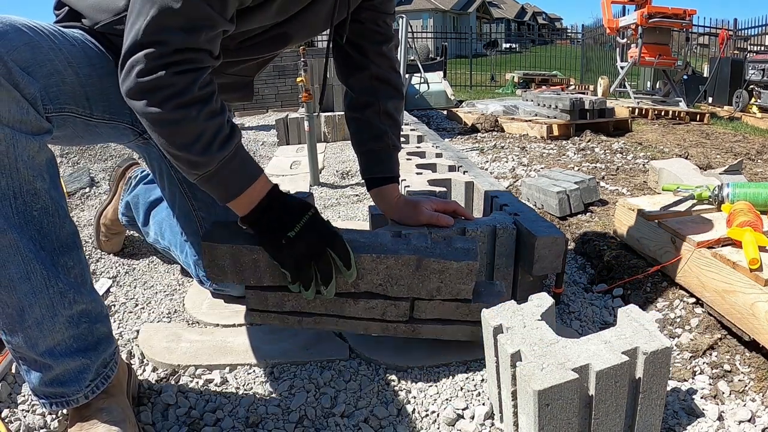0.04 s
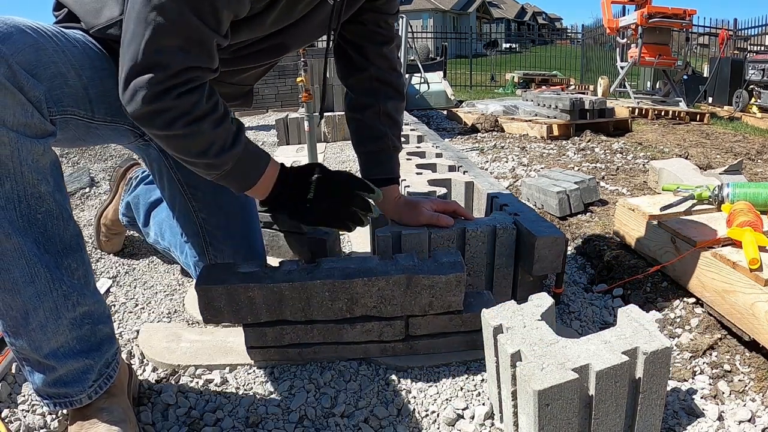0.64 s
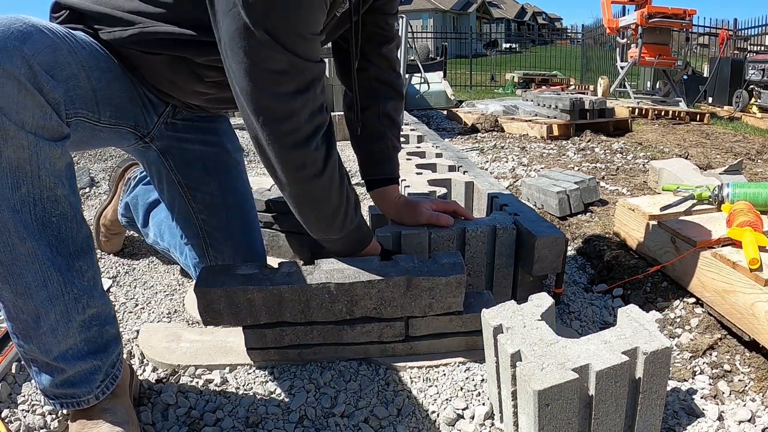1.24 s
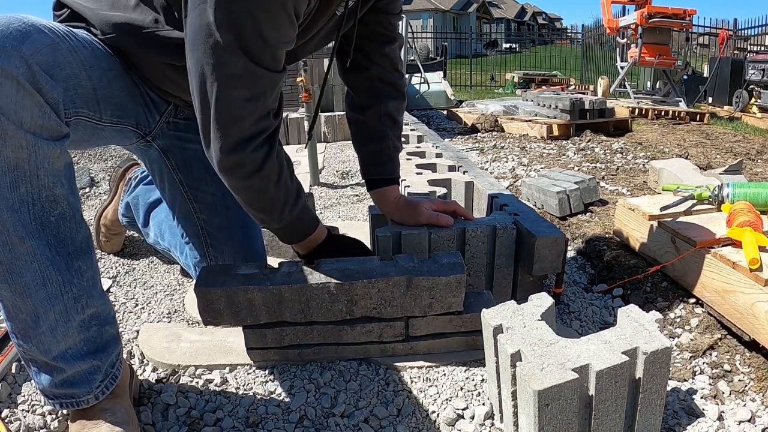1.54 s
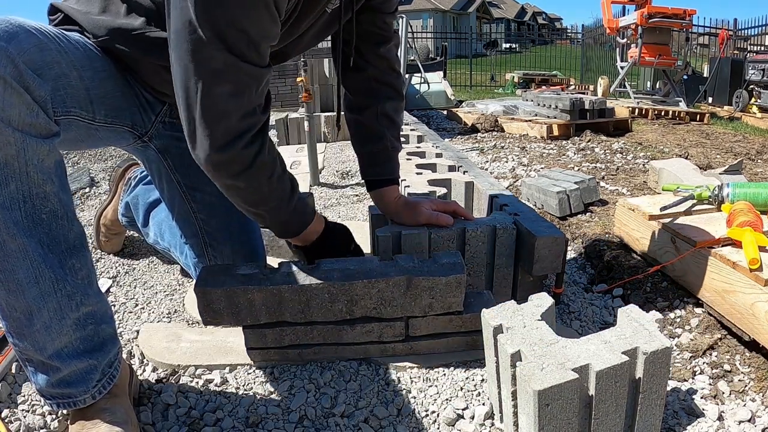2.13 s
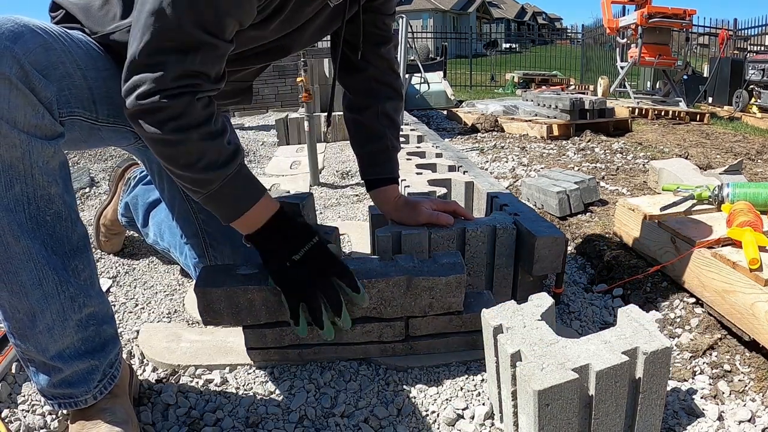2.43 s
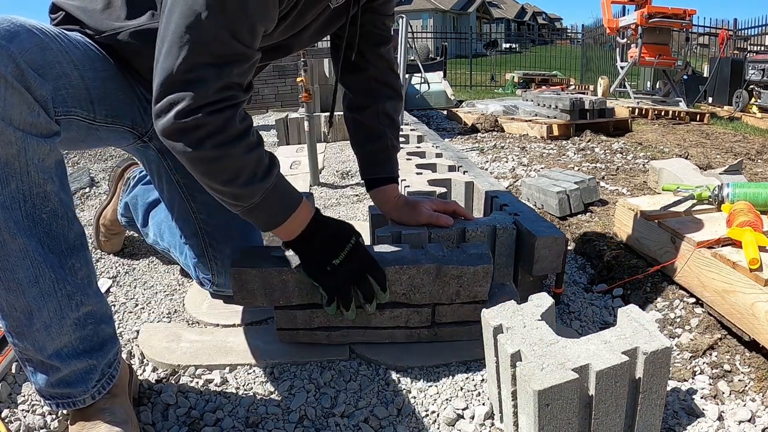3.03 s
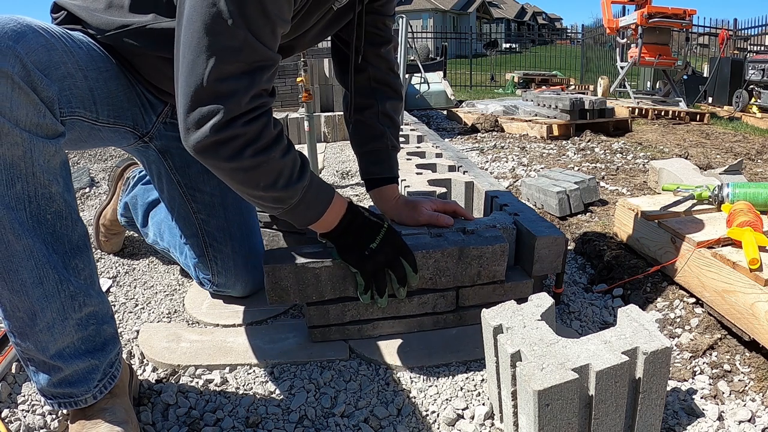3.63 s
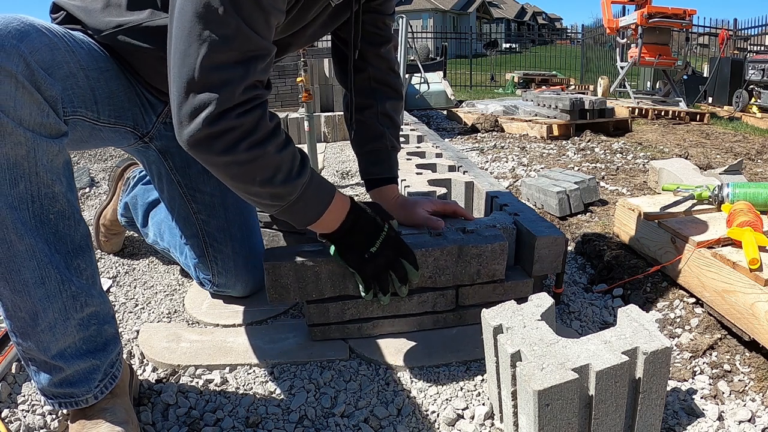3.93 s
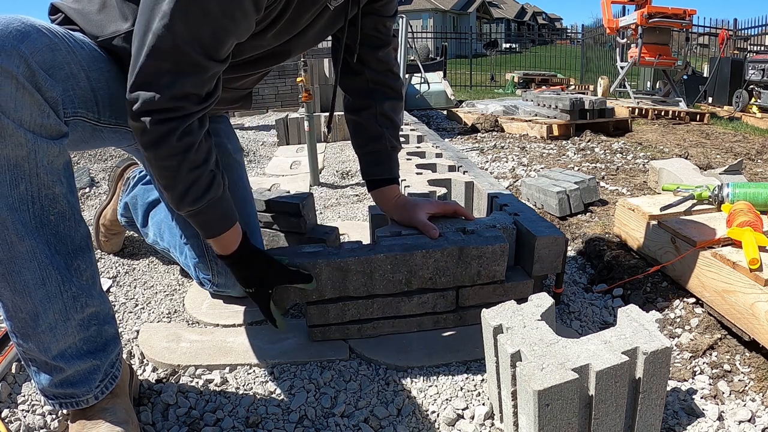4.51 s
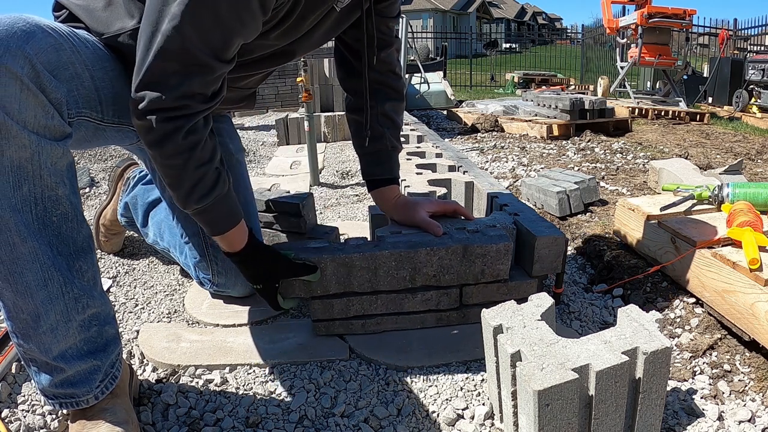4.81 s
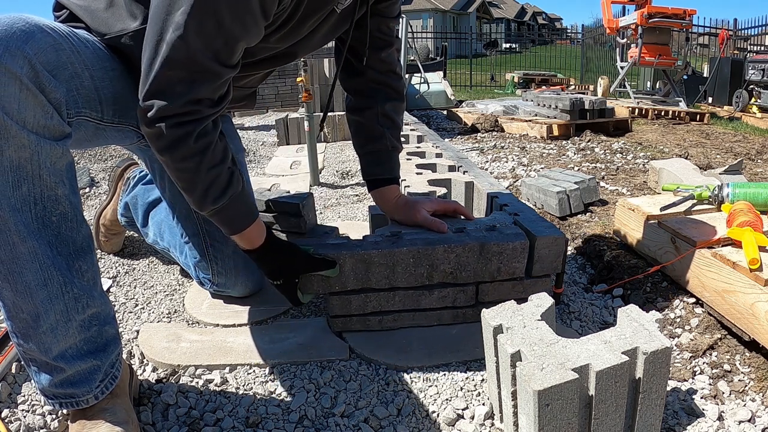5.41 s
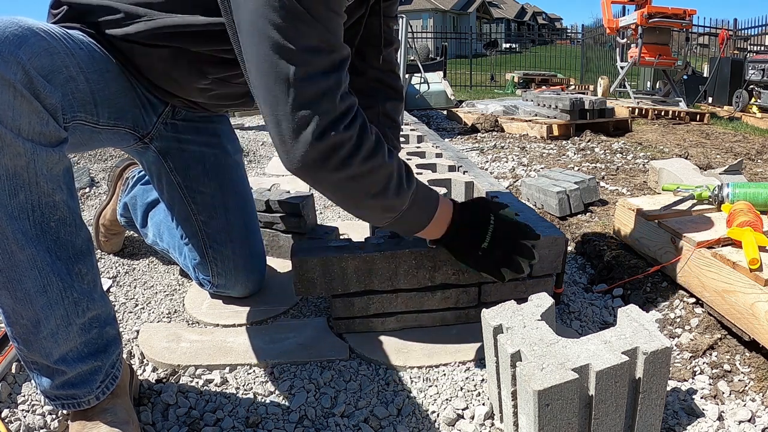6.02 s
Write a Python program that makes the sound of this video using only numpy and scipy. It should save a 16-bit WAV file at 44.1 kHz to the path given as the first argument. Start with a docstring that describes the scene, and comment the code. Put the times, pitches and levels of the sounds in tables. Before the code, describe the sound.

A concrete block knocks down onto others and grinds into place, with glove rubs and wind rumbling on the microphone.

```python
"""A concrete wall block, close to the microphone, is set on the course below, rocks twice and is shoved
into place in two runs. Blows ring its modes and thump the stack; sliding, it grinds; it clinks as it
knocks lightly or catches on grit. In between, a work glove sweeps the blocks: fabric snaps, fingertips
rasp, crumbs crack. Outdoors in a yard with little echo; wind buffets the microphone over a faint hiss."""
import sys
import numpy as np
from scipy import signal
from scipy.fft import rfft, irfft, next_fast_len
from scipy.io import wavfile
from scipy.ndimage import uniform_filter1d

SR = 44100
rng = np.random.default_rng(int(sys.argv[2]) if len(sys.argv) > 2 else 0)


def generate_wav(signal):
    """Clip the signal to [-1, 1] and save it as 16-bit WAV at the path in sys.argv[1]."""
    frames = np.transpose(np.atleast_2d(signal))
    scaled = np.clip(frames, -1, 1) * 32767
    pcm = np.round(scaled).astype(np.int16)
    wavfile.write(sys.argv[1], SR, pcm)


N = 276066

# The block's modes. Each row: pitch in Hz, then relative dB when struck, in the first slide, in the second.
BLOCK_MODES = [(790, -4.5, -10, -14), (1408, -20, 0, 0), (1754, -15, -7, -10), (2044, -24, -5.5, -6),
               (2752, -7.5, -6.5, -5), (3162, -14, -15, -8), (3586, -25, -16, -16), (3881, -27, -16, -15),
               (4205, -25, -8, -9), (4325, -21, -5, -14), (4695, -27, -13.5, -18), (5025, -28, -24, -16),
               (5515, -17, -16, -21), (6080, -35, -29, -31), (6390, -40, -32, -27), (6730, -42, -27, -31),
               (7130, -40, -25, -19), (7930, -35, -24, -38), (8880, -25, -38, -29), (9260, -28, -29, -32),
               (9870, -28, -27, -36), (11200, -32, -33, -32), (11900, -27, -30, -39),
               (12700, -33, -35, -39)]
# Block against block. Each row: start in seconds, ring in dB, brightness in Hz, favoured mode in Hz, its
# boost in dB, damping in dB per second (sign ignored), thud in dB, thud pitch in Hz, contact in seconds.
BLOWS = [(.2912, -17, 7100, 2700, 1, 9, -13.5, 840, 0.0067),
         (.2938, -29.5, 1090, 790, 17, -11, -11.5, 260, 0.011),
         (0.436, -30, 3350, 2090, 21, 29, -9, 507, 0.0099),
         (0.5145, -17.5, 1540, 2120, 19.5, 195, -8, 590, 0.0033),
         (3.7301, -25.5, 2320, 1465, 26.5, 588, -10.5, 434, 0.0039),
         (5.039, -39, 3000, 3180, 21, 250, -14, 409, 0.0061)]
# Tipping onto one edge stiffens the lowest mode. Each row: time in seconds, rise in Hz.
EDGE_BEND = [(.345, 0), (.385, 40), (.42, 12), (.515, 38), (.56, 0)]
# Shoves along the course. Each row: start and length in seconds, fastest point as a share of the length,
# grinding in dB, tilt in dB per octave, growl in dB relative to the grinding.
BLOCK_SHOVES = [(2.815, 0.4, 0.46, -41.5, -0.5, -3), (3.002, .44, 0.64, -36, 0.5, -10),
                (3.33, 0.42, 0.24, -44.5, -3.5, -3), (3.501, 0.41, 0.67, -40.5, -3.5, -3),
                (3.882, 0.33, 0.23, -52, -2, -1), (4.756, 0.42, 0.61, -44, 2.5, 5),
                (4.916, 0.21, 0.37, -39, -4.5, 0), (5.17, 0.41, 0.28, -44.5, 2.5, 5.5),
                (5.431, 0.29, 0.52, -40.5, -0.5, 2.5)]
# Short clinks with a crunch: the block knocks lightly or catches on grit. Each row: start in seconds,
# clink in relative dB, favoured mode in Hz, crunch in relative dB.
BLOCK_CLINKS = [(0.798, -57, 4300, -77), (0.845, -47.5, 5500, -39), (0.846, -46, 2044, -62),
                (2.94, -30, 4300, -43), (3.308, -30, 1408, -40), (3.363, -28.5, 4830, -46),
                (3.831, -45, 1408, -51), (4.003, -37.5, 1408, -55), (4.14, -46.5, 2044, -66),
                (4.824, -44.5, 1408, -66), (4.879, -39.5, 4270, -41), (5.066, -34, 2752, -31),
                (5.1486, -32.5, 2950, -31), (5.227, -43, 1408, -49), (5.639, -42.5, 5300, -32),
                (5.697, -45, 1408, -45), (5.778, -42, 5000, -44)]
# Glove and sleeve on concrete. Each row: start and length in seconds, fastest point as a share of the
# length, level in dB, tilt in dB per octave.
GLOVE_SWEEPS = [(0.168, 0.53, 0.33, -48.5, 7.5), (0.573, 0.13, 0.75, -42, 5.5),
                (1.08, 0.18, 0.59, -55, 2.5), (1.208, 0.25, 0.33, -42.5, 3.5),
                (1.253, 0.37, 0.47, -42.5, 5), (1.789, 0.16, 0.56, -40.5, 4.5),
                (1.883, 0.066, 0.47, -42, 10), (2.19, 0.075, 0.52, -41.5, 7),
                (2.349, 0.045, 0.55, -46.5, 10.5), (2.589, 0.072, 0.41, -54.5, 13),
                (2.612, 0.38, 0.41, -62.5, 10.5), (3.838, 0.54, 0.18, -53.5, 9),
                (4.228, 0.16, 0.85, -55, 9), (4.333, 0.5, 0.13, -61, 4.5), (5.762, 0.25, 0.16, -52, 9.5)]
# Fingertip drags. Each row: start and length in seconds, fastest point as a share of the length,
# level in dB, then first pitch, last pitch and half-width in Hz.
FINGER_DRAGS = [(0.589, 0.115, 0.64, -40.5, 1810, 2094, 595), (4.309, 0.07, 0.89, -47.5, 2274, 1873, 350),
                (4.369, 0.18, 0.63, -54, 1430, 1040, 190)]
# Loose grit under the hand. Each row: start in seconds, level in relative dB, band centre in Hz.
GRIT_TICKS = [(0.385, -37, 3760), (1.21, -38.5, 1720), (2.651, -43, 2050), (2.6963, -39.5, 2200),
              (2.737, -42, 2600), (2.782, -48.5, 2500), (3.861, -41.5, 2840), (4.685, -38.5, 1600)]
# Gusts on the microphone. Each row: start and hold in seconds, rumble in dB, flutter in dB relative to it.
MIC_GUSTS = [(0, 0.0078, -26.5, -15), (0.095, 0.23, -22.5, -11), (0.405, 0.13, -33, -5),
             (0.751, 0.0093, -26.5, -11), (1.837, 0.047, -30, -3.5), (2.233, 0.041, -31.5, -5.5),
             (2.686, 0.039, -36, -4.5), (2.858, 0.069, -34.5, 0), (3.298, 0.0065, -38, 4),
             (3.456, 0.0056, -25, -5.5), (3.602, 0.345, -28, -4.5), (3.945, 0.21, -30.5, -4),
             (4.227, 0.0096, -24, -8.5), (4.59, 0.11, -28.5, -6.5), (5.78, 0.055, -28, -7)]
# Spectra of crushed grit, the course below, the glove, the wind's rumble and flutter, and the open air.
# Each row: frequency in Hz, spectral density in relative dB.
CRUNCH_SPECTRUM = [(900, 11), (4500, -6), (10000, -11), (14000, -32)]
GROWL_SPECTRUM = [(200, -1), (430, -1.5), (1000, -21), (1600, -16)]
GLOVE_SPECTRUM = [(450, 4.5), (850, 0.5), (1400, 7), (1900, 4.5), (2600, -1), (7300, -26), (15000, -49.5)]
RUMBLE_SPECTRUM = [(18, -3.5), (30, 1), (60, 3), (100, -2), (140, -9), (250, -56)]
FLUTTER_SPECTRUM = [(90, -16), (150, 3), (230, -5.5), (400, -22), (1000, -46.5)]
AIR_SPECTRUM = [(800, 0), (2600, -16), (8800, -23), (11000, -38)]

LONG_RING_HZ = 1408   # the supports barely damp this mode


def knocks(thud_sag=.75, rattle_db=-21, choke_t60=.028):
    """Each blow rings the block, cracks grit at the contact and thumps the heavily damped stack below."""
    out, t = np.zeros(N), np.arange(SR) / SR
    for start, ring_db, bright_hz, spot_hz, spot_db, damping, thud_db, thud_hz, contact_s in BLOWS:
        bend = np.cumsum(np.interp(start + t, *np.transpose(EDGE_BEND))) / SR
        modes = 0
        for k, (hz, db, *_) in enumerate(BLOCK_MODES):
            # the contact spot favours one mode; a blunt contact leaves out the upper ones
            gain = from_db(db + spot_db * nearness(hz, spot_hz)) / np.hypot(1, (hz / bright_hz) ** 3)
            tone = np.sin(2 * np.pi * (hz * t + bend * (k == 0)))
            modes += (-1) ** k * gain * tone * dying(t, ring_time(hz, damping))
        # the next landing chokes what still rings
        landing = min([s for s, *_ in BLOWS if s > start + .02], default=start + 1)
        modes *= dying(np.maximum(start + t - landing, 0), choke_t60)
        crack = cut(noise(SR), [300, max(bright_hz * .73, 800)], "band", order=3) * dying(t, .035)
        strike = (modes + crack) * rising(t, .00019)
        # the thud lasts only as long as the contact and sinks in pitch as it relaxes
        progress = np.clip(t / contact_s, 0, 1)
        sinking_hz = thud_hz * (1 + thud_sag * (.5 - progress))
        thud = np.sin(2 * np.pi * np.cumsum(sinking_hz) / SR) * np.sin(np.pi * progress)
        rattle = rms_one(cut(noise(SR), [180, 850], "band", order=3)) * dying(t, .11) * rising(t, .00074)
        stack = thud + from_db(rattle_db) * rattle
        add(out, start, from_db(ring_db) * strike + from_db(thud_db) * stack)
    return out


def sliding(speed_power=2.09, judder_db=2.3, wander_db=2.4, crush_db=-17, smear_hz=4500):
    """Grit breaks under the moving block in uneven slips and keeps it ringing; the course below growls."""
    starts, _, _, grind_db, tilt, growl_db = np.transpose(BLOCK_SHOVES)
    speeds = np.array([stroke(*shove[:3]) for shove in BLOCK_SHOVES])
    forces = from_db(grind_db)[:, None] * speeds ** speed_power
    shares = np.transpose([mode_shares(start) for start in starts])
    judder = rms_one(from_db(judder_db * drift(50)))
    slips = evened(grains(per_s=2500, spread_db=.5), .011)
    rings = 0
    for (hz, *_), share in zip(BLOCK_MODES, shares):
        octaves_up = np.clip(np.log2(hz / LONG_RING_HZ), 0, 2)
        push = (share * from_db(tilt * octaves_up)) @ forces
        # weight on the block shortens its ring; grit in the contact damps the high modes further
        t60 = ring_time(hz, damping_db_per_s=170 * (1 + (hz / smear_hz) ** 3))
        # friction both feeds and damps each mode, so its ring holds steady under the push
        held = evened(rms_one(ring(slips, hz, t60)), .04)
        rings += push * held * from_db(wander_db * drift(8.3))   # the moving contact shifts its strength
    crush = from_db(crush_db) * (from_db(tilt) @ forces) * coloured(slips, CRUNCH_SPECTRUM)
    growl = (from_db(growl_db) @ forces) * coloured(noise(), GROWL_SPECTRUM)
    return judder * (rings + crush + growl)


def clinks(clink_gain_db=4, crunch_gain_db=-3, rise_s=.0035, spot_db=10):
    """The block knocks lightly or catches on grit: its modes ring briefly, with a bright crunch."""
    rings, crunch_level, t = np.zeros(N), np.zeros(N), np.arange(SR // 5) / SR
    hz = np.transpose(BLOCK_MODES)[0]
    onset = rising(t, rise_s)
    decays = dying(t, ring_time(hz, damping_db_per_s=330)[:, None])
    for start, clink_db, spot_hz, crunch_db in BLOCK_CLINKS:
        phases = rng.uniform(0, 2 * np.pi, len(hz))
        modes = np.sin(2 * np.pi * hz[:, None] * t + phases[:, None]) * decays
        gains = mode_shares(start) * from_db(spot_db * nearness(hz, spot_hz))
        clink = gains @ modes / np.linalg.norm(gains)
        add(rings, start, from_db(clink_db + clink_gain_db) * onset * clink)
        add(crunch_level, start, from_db(crunch_db + crunch_gain_db) * onset * dying(t, .045))
    return rings + crunch_level * coloured(grains(per_s=15000, spread_db=0), CRUNCH_SPECTRUM)


def ring_time(hz, damping_db_per_s):
    """Seconds to fall 60 dB: concrete swallows high modes sooner, and the contact adds its own loss."""
    free_t60 = .26 / np.hypot(1, hz / 2700) * (1 + 2 * nearness(hz, LONG_RING_HZ))
    return 60 / (60 / free_t60 + np.abs(damping_db_per_s))


def mode_shares(seconds, regrip_s=4.5):
    """Mode amplitudes in a slide, total power 1; between slides the hand moves to the block's end."""
    gains = from_db([second if seconds > regrip_s else first for _, _, first, second in BLOCK_MODES])
    return gains / np.linalg.norm(gains)


def glove(speed_power=1.84, patchy_db=1.5, flicker_db=2.2, bounce_s=.000829):
    """Fabric catches on the rough face in thousands of tiny snaps; each sweep has its own brightness."""
    rubs = np.array([from_db(db) * stroke(*timing) ** speed_power for *timing, db, _ in GLOVE_SWEEPS])
    level = rubs.sum(axis=0)
    tilt = np.transpose(GLOVE_SWEEPS)[-1] @ rubs / (level + 1e-12)   # overlapping sweeps blend colours
    snaps = coloured(grains(per_s=5000, spread_db=1.66), GLOVE_SPECTRUM) * from_db(patchy_db * drift(87))
    # the bounce off the next block face shifts its notches as the hand travels
    now = np.arange(N)
    delay = bounce_s * SR * np.exp(.18 * drift(4))
    spectrum = rfft(rms_one(snaps + .4 * np.interp(now - delay, now, snaps)))
    octaves = np.log2(np.maximum(np.fft.rfftfreq(N, 1 / SR), 1) / 2000)
    out = 0
    for centre in np.arange(-2.5, 3.5, .5):
        # overlapping half-octave bands, each flickering as the fingers shift
        band = irfft(spectrum * np.maximum(1 - 2 * np.abs(octaves - centre), 0), N)
        out += band * from_db(tilt * min(centre, 2) + flicker_db * drift(19))
    return level * out


def fingertips():
    """Gloved fingertips stick and slip at an unsteady rate: a narrow rasp that glides with the drag."""
    out, t = 0, np.arange(N) / SR
    for start, length, fastest, db, first_hz, last_hz, width_hz in FINGER_DRAGS:
        hz = np.interp(t, [start, start + length], [first_hz, last_hz])
        phase = 2 * np.pi * np.cumsum(hz) / SR
        rasp = drift(width_hz) * np.cos(phase) + drift(width_hz) * np.sin(phase)
        out += from_db(db) * stroke(start, length, fastest) * rasp
    return out


def grit(gain_db=-6):
    """A crumb of concrete cracks with a short, dry tick."""
    out, t = np.zeros(N), np.arange(SR // 10) / SR
    for start, db, hz in GRIT_TICKS:
        burst = noise(len(t)) * dying(t, .024) * rising(t, .00094)
        tick = cut(burst, [hz * .6, hz * 1.4], "band", order=3)
        add(out, start, from_db(db + gain_db) * tick / np.std(tick[:SR // 200]))
    return out


def wind(breeze_db=-41.5, swing_db=3.5, breeze_flutter_db=-9, lumpy_db=3):
    """Eddies right at the microphone port: large ones rumble, small ones flutter. Gusts top a breeze."""
    breeze = from_db(breeze_db + swing_db * drift(7))
    gusts = np.array([from_db(db) * gust(start, hold) for start, hold, db, _ in MIC_GUSTS])
    flutter_share = from_db([db for *_, db in MIC_GUSTS])
    rumble_level = np.sqrt(breeze ** 2 + np.sum(gusts ** 2, axis=0))
    flutter_level = np.sqrt((breeze * from_db(breeze_flutter_db)) ** 2 + flutter_share ** 2 @ gusts ** 2)
    rumble = evened(coloured(noise(), RUMBLE_SPECTRUM), .067)
    flutter = evened(coloured(noise(), FLUTTER_SPECTRUM) * from_db(lumpy_db * drift(27.8)), .17)
    return rumble_level * rumble + flutter_level * flutter


def gust(start, hold, attack_s=.024, release_s=.045):
    """Strength (0-1) of one gust: it swells, holds and dies away."""
    t = np.arange(N) / SR - start
    return np.clip(t / attack_s, 0, 1) * np.exp(-np.clip((t - attack_s - hold) / release_s, 0, 20))


def yard(direct, echo_db=-27, t60=.26):
    """The direct sound arrives first, then faint, dull scatter from the ground and the stacks around."""
    t = np.arange(SR // 2) / SR
    tail = cut(noise(len(t)), 4600, "low") * dying(t, t60) * (t > .006)
    return direct + from_db(echo_db) * signal.fftconvolve(direct, tail / np.linalg.norm(tail))[:N]


def air(level_db=-68.5):
    """The faint, steady hiss of the open air behind the work."""
    return from_db(level_db) * coloured(noise(), AIR_SPECTRUM)


def stroke(start, length, fastest):
    """Speed (0-1) of one arm movement: from rest up to its fastest and back to rest."""
    progress = (np.arange(N) / SR - start) / length
    return np.sin(np.pi * np.interp(progress, [0, fastest, 1], [0, .5, 1]))


def grains(per_s, spread_db):
    """Random clicks, more unequal in size as the spread grows; rms 1."""
    sizes = from_db(spread_db * np.minimum(rng.exponential(1, N), 5)) * rng.choice([-1, 1], N)
    return rms_one(sizes * (rng.random(N) < per_s / SR))


def ring(x, hz, t60):
    """One mode: a unit click sets a sine of height 1 ringing."""
    radius, angle = dying(1 / SR, t60), 2 * np.pi * hz / SR
    return signal.lfilter([0, np.sin(angle)], [1, -2 * radius * np.cos(angle), radius ** 2], x + 1e-18)


def coloured(x, spectrum):
    """Gives a steady signal a spectrum, with steep skirts beyond its ends; rms 1."""
    hz, db = np.transpose(spectrum)
    size = next_fast_len(N)
    octave = np.log2(np.maximum(np.fft.rfftfreq(size, 1 / SR), 1))
    beyond = np.abs(octave - np.clip(octave, np.log2(hz[0]), np.log2(hz[-1])))
    gain = from_db(np.interp(octave, np.log2(hz), db) - 20 * beyond)
    return rms_one(irfft(rfft(x, size) * gain, size)[:N])


def evened(x, seconds):
    """Takes out slow swells, so that only the fast grain is left."""
    return x / np.sqrt(np.abs(uniform_filter1d(x ** 2, int(seconds * SR))) + 1e-6)


def nearness(hz, centre_hz):
    """1 at the centre, falling away within about a tenth of it."""
    return np.exp(-(10 * np.log(hz / centre_hz)) ** 2)


def drift(hz):
    """Random wander below hz; rms 1."""
    return rms_one(cut(noise(), hz, "low"))


def cut(x, hz, kind, order=2):
    return signal.sosfilt(signal.butter(order, hz, kind, fs=SR, output="sos"), x + 1e-18)


def noise(samples=N):
    return rng.standard_normal(samples)


def rising(t, rise_s):
    return 1 - np.exp(-t / rise_s)


def dying(t, t60):
    return from_db(-60 * t / t60)


def from_db(db):
    return 10 ** (np.asarray(db) / 20)


def rms_one(x):
    return x / np.sqrt(np.mean(x ** 2) + 1e-20)


def add(out, start, sound):
    at = int(start * SR)
    out[at:at + len(sound)] += sound[:N - at]


def scene():
    """Block and glove close by in the yard, wind on the one microphone, air behind."""
    work = knocks() + sliding() + clinks() + glove() + fingertips() + grit()
    return (yard(work) + wind() + air())[None]


def record(dry, cutoff_hz=15200):
    """The microphone's signal is cut steeply at the top."""
    return signal.sosfilt(signal.ellip(10, .1, 80, cutoff_hz, fs=SR, output="sos"), dry)


dry = scene()
out = record(dry)
generate_wav(out)
```